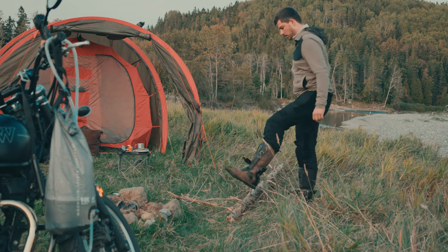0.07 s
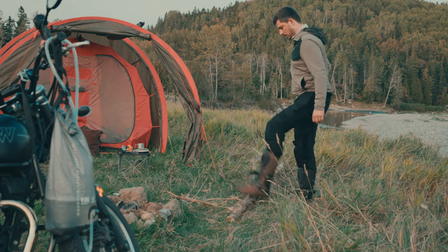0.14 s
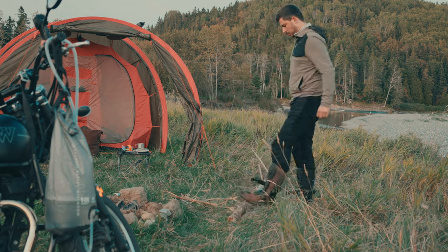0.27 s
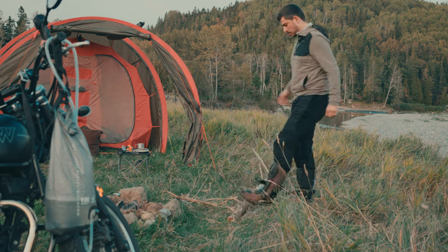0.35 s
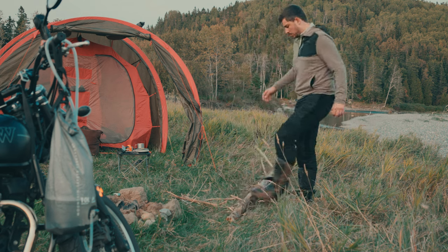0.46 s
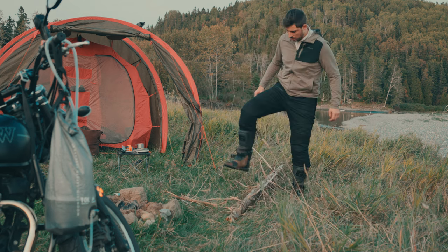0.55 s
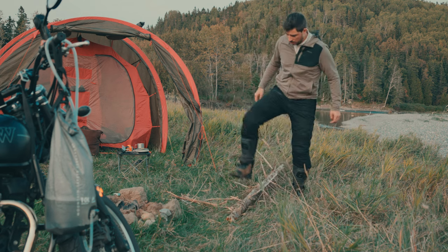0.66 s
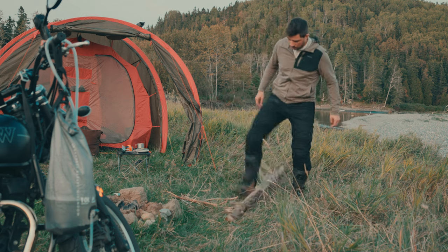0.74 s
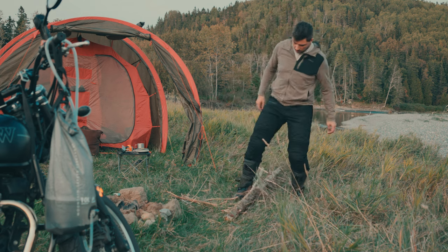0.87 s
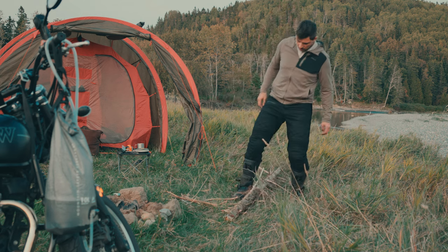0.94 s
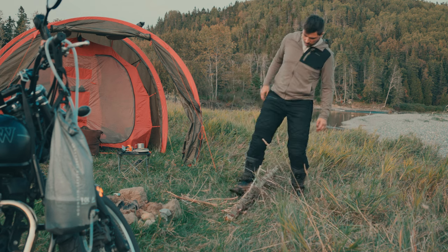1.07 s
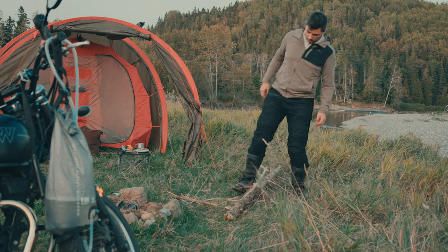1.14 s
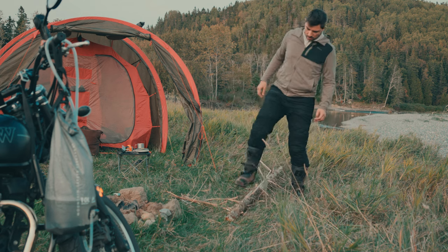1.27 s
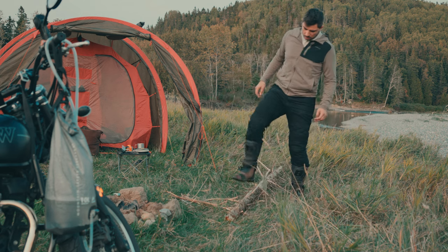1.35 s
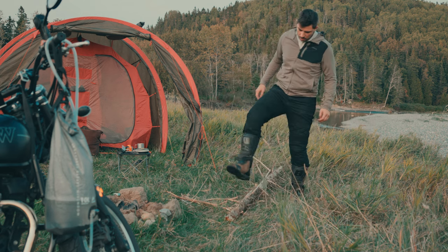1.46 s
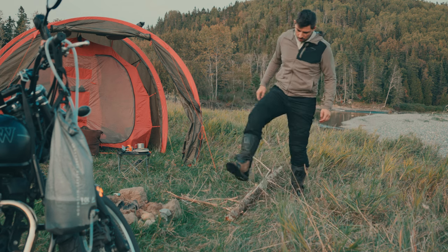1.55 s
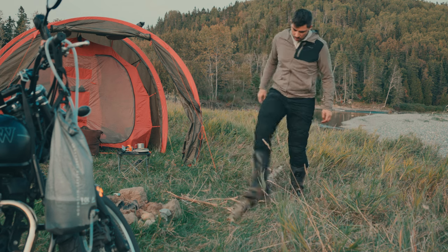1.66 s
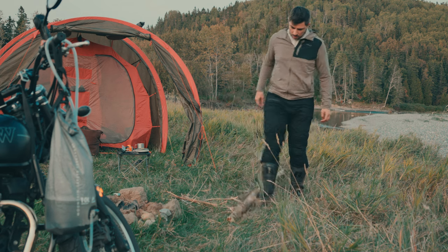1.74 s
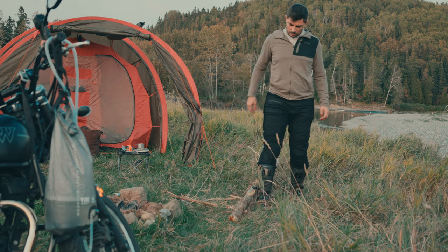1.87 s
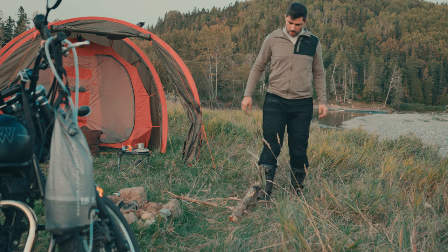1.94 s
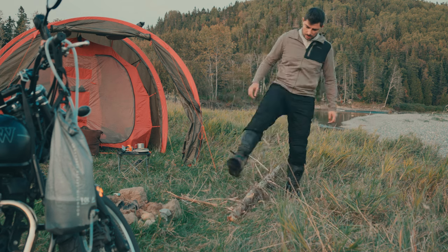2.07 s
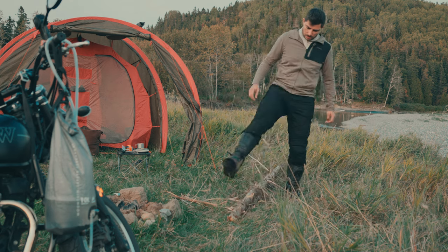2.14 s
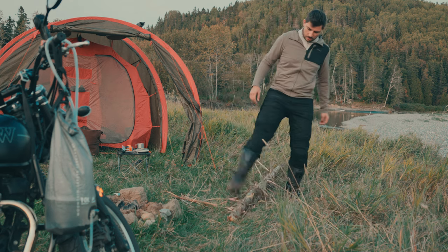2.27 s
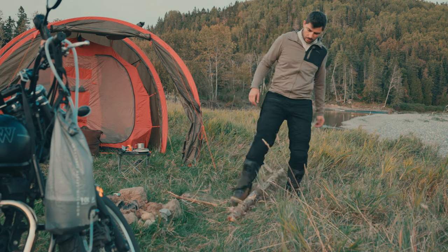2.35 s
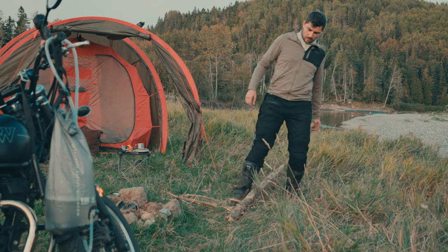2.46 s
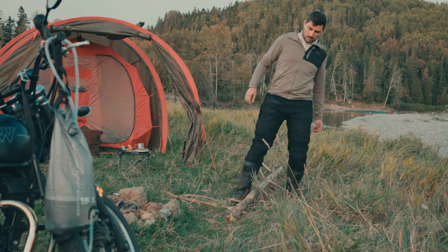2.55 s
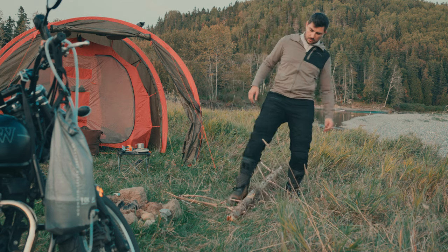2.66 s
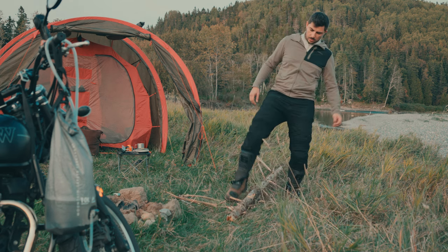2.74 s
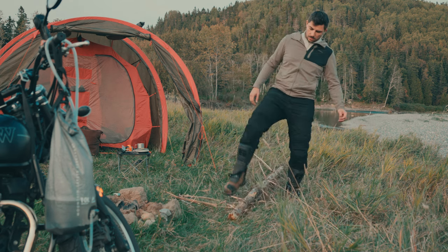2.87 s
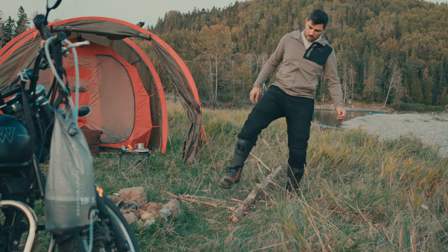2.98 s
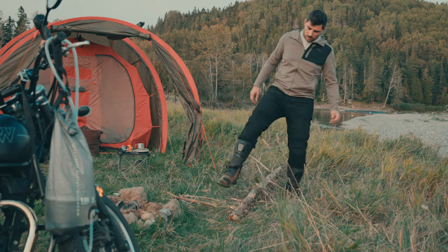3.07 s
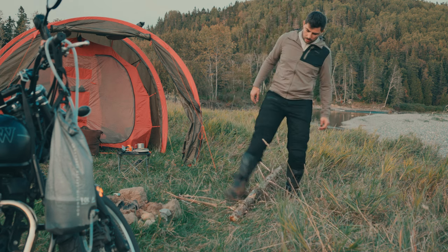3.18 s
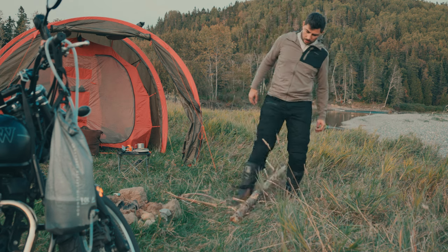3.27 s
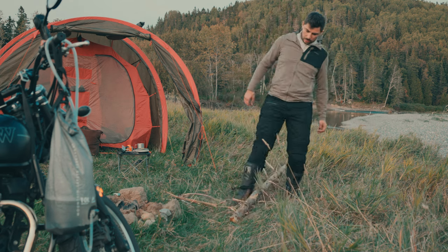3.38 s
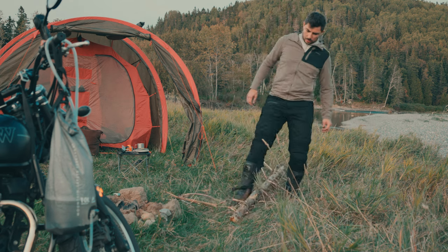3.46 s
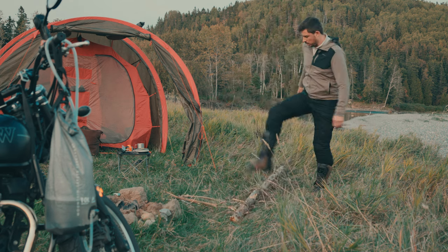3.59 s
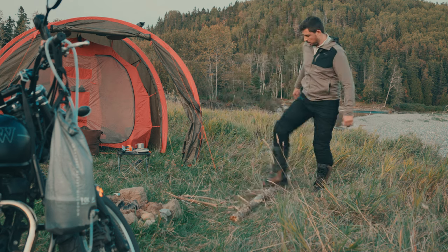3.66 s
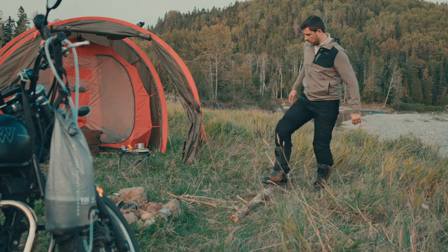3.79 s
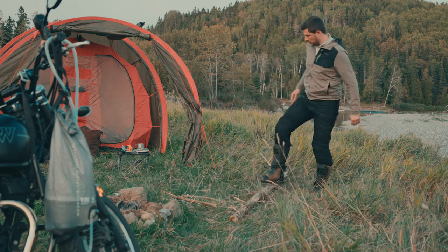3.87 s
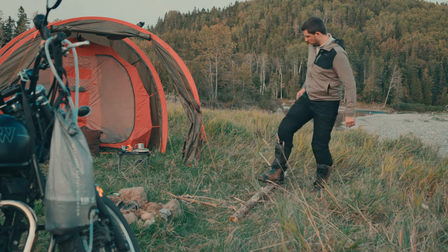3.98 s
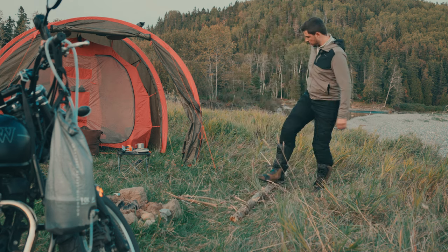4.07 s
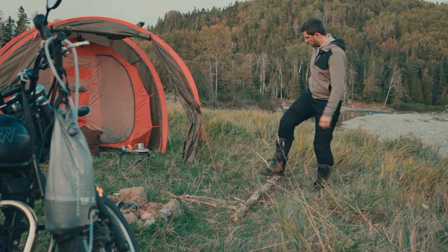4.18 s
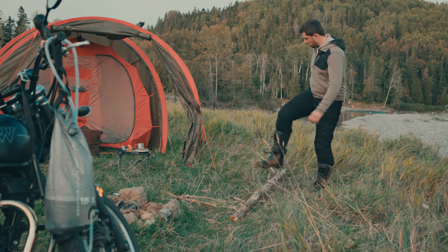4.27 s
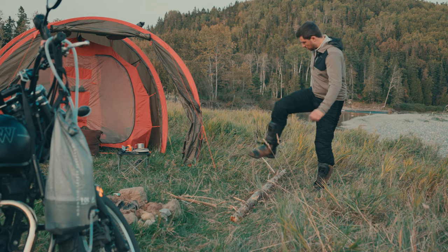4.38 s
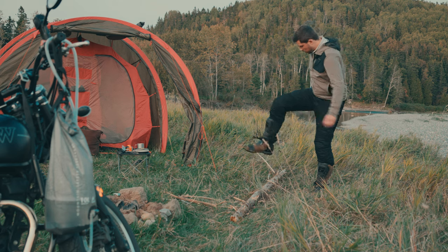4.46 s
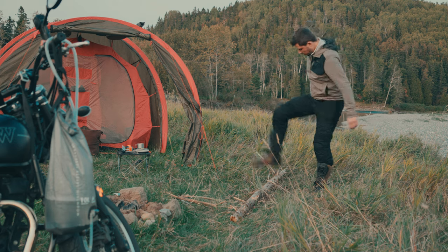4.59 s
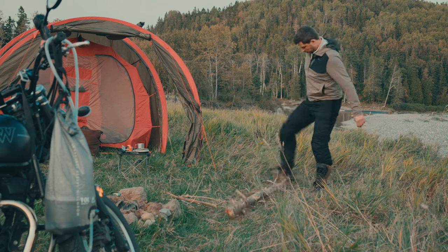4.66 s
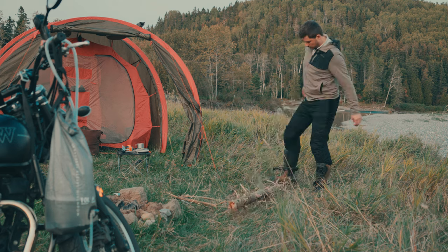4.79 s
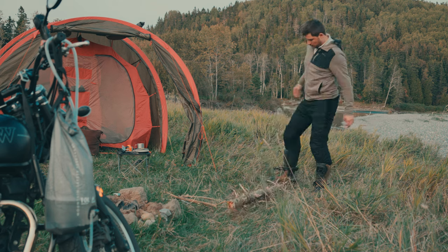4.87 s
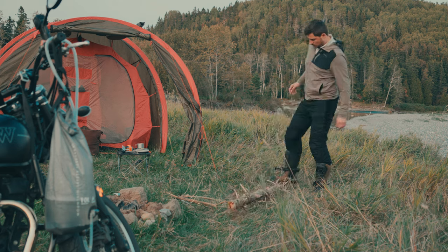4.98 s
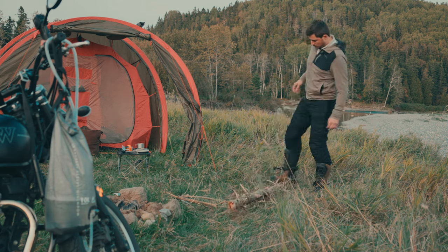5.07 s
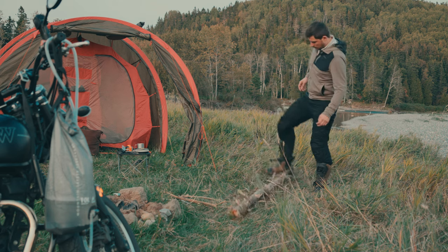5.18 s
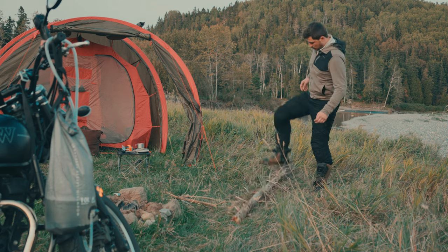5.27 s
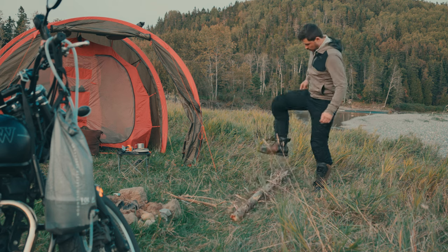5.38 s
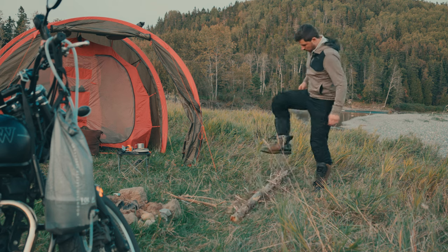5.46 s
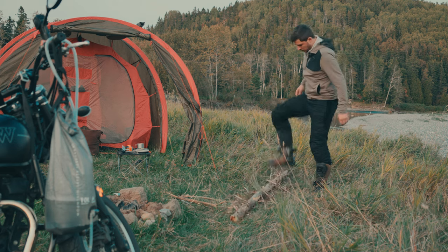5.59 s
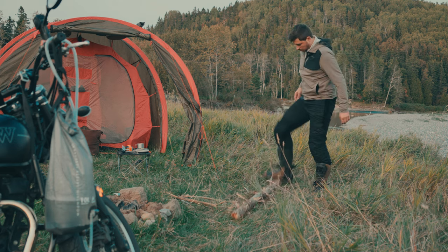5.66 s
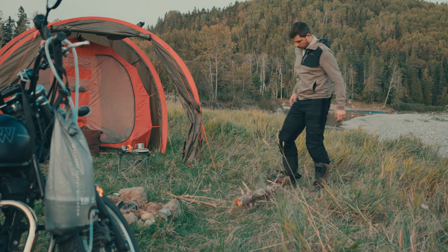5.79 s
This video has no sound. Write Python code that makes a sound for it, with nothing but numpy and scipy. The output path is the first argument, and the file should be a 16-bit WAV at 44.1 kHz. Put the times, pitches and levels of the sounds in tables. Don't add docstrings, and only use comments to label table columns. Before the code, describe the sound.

A boot stamps dry branches apart on grass in bursts of sharp cracks and crunches, with low wind buffeting and faint river hiss.

```python
import sys
import numpy as np
from scipy import signal
from scipy.fft import rfft, irfft, next_fast_len
from scipy.io import wavfile
from scipy.ndimage import uniform_filter1d

SR = 44100
rng = np.random.default_rng(int(sys.argv[2]) if len(sys.argv) > 2 else 0)


def invert_db(x):
    u = np.asarray(x, float) / 20
    return 10 ** u


def file_out(sig):
    cols = np.atleast_2d(sig).T
    lim = np.clip(cols, -1, 1)
    pcm = np.round(lim * 32767).astype(np.int16)
    wavfile.write(sys.argv[1], SR, pcm)


N = 257102

# time in seconds, wind level in dB, how far the gust reaches up in pitch in dB.
GUSTS = [(0.0, -36.5, 4), (0.42, -32.5, 5), (0.75, -40, 1), (0.86, -38, 1), (1.1, -41, 0), (1.28, -36.5, 2),
         (1.51, -37, 3), (2.06, -34, 5), (2.42, -37.5, 4), (2.79, -35.5, 3), (3.04, -38.5, 3),
         (3.49, -35, 3), (3.62, -41, -1), (4.3, -42, -9), (4.62, -42, -9), (4.9, -40, 0), (5.5, -41.5, -5),
         (5.83, -49, -4)]


def level(x):
    return x / np.sqrt(np.mean(x ** 2))


def band(x, lo_hz, hi_hz, order=2):
    return signal.sosfilt(signal.butter(order, [lo_hz, hi_hz], "band", fs=SR, output="sos"), x)


def treble(x):
    return band(band(x, 5200, 18000), 3000, 6500, order=1)


def coloured(points):
    hz, db = np.transpose(points)
    size = next_fast_len(N)
    log_hz = np.log(np.arange(size // 2 + 1) * SR / size + 1)
    gain = invert_db(np.interp(log_hz, np.log(hz), db))
    white = rfft(rng.standard_normal(N), size)
    return level(irfft(white * gain, size)[:N])


def curve(rows, rest_db):
    s, *columns = np.transpose(rows)
    t = np.arange(N) / SR
    return np.array([np.interp(t, s, c, rest_db, rest_db) for c in columns])


def walk(rate):
    k = int(SR / rate)
    steps = np.repeat(rng.standard_normal(N // k + 1), k)
    return uniform_filter1d(uniform_filter1d(steps, k), k)[:N]


def grains(rate, scatter_db):
    when, size = rng.random(N), rng.exponential(size=N)
    sign = np.sign(rng.standard_normal(N))
    return (when < rate / SR) * sign * invert_db(scatter_db * np.minimum(size, 4))


def ring(t, hz, t60):
    return np.sin(2 * np.pi * hz * t) * np.exp(-np.log(1000) * t / t60)


def add(out, s, sound):
    i = int(s * SR)
    out[i:i + len(sound)] += sound[:N - i]


def all_cracks():
    # time in seconds, level in dB, ring in Hz,
    # treble snap in dB, thick-wood knock in dB.
    snaps = [(.212, -2.5, 3906, -16, -14.5), (0.2174, -9.5, 3675, -17, -12.5),
             (1.7322, -11, 3600, -28, -31), (1.7368, -20.5, 3000, -2, -19), (1.7438, -18, 2970, -24, -32),
             (2.3616, -20, 1970, -29, -22), (2.3978, -25, 3800, -2, -12), (2.4207, -28.5, 2820, 1.5, -16),
             (3.2849, -14, 2420, -17, -2.5), (3.6811, -13.5, 3840, -2, -11), (4.7046, -15.5, 2815, -21, 0),
             (4.7084, -3, 4700, -18, -16.5), (4.7292, -14, 3670, -13.5, -14),
             (4.7625, -25.5, 2890, 3.5, -20), (5.705, -15, 4700, 0.5, -18.5), (5.7652, -23.5, 2900, -7, -7)]
    # time in seconds, level in dB, ring in Hz,
    # treble snap in dB, thick-wood knock in dB.
    rips = [(0.1875, -29, 2210, -5, 4), (.205, -26.5, 2140, -15.5, -15), (0.23, -26.5, 2000, -13, -16),
            (0.7834, -23, 2620, -17, -15), (.7978, -5, 4320, -6, -7), (0.812, -21, 3800, -6, -20.5),
            (1.6711, -25, 4430, -8, -22.5), (1.7773, -16.5, 3100, -7.5, -6), (2.3914, -24.5, 2470, -8, 4),
            (3.6755, -8, 3000, -22, -24.5), (3.687, -19.5, 2586, -13, -28.5),
            (4.7202, -21.5, 2870, -5.5, -2), (4.7493, -12.5, 2700, -2, -16)]
    # time in seconds, level in dB, ring in Hz,
    # thick-wood knock in dB.
    splits = [(0.1809, -28.5, 2910, 8), (0.1907, -29.5, 1570, 1), (.2356, -20.5, 2110, -10),
              (.748, -27.5, 3940, -20), (.7554, -37, 3190, 3), (0.7622, -28, 3300, -3),
              (0.8184, -19, 3470, -28), (1.657, -37, 1500, -16), (1.68, -33, 3560, -17),
              (1.6942, -25.5, 3510, -9), (1.7243, -31, 3740, -16), (1.7606, -23, 3350, -28),
              (1.7952, -23.5, 3300, 4), (1.812, -35, 2270, -5), (2.3368, -28.5, 2370, 9.5),
              (2.3565, -26.5, 3770, -12), (2.3775, -31, 2300, -20), (3.2366, -31, 1510, 13.5),
              (3.2463, -38, 3150, 14), (3.255, -29, 3900, -16), (3.264, -23, 3900, -15),
              (3.3008, -35, 2240, -12), (3.6894, -21, 4470, -19), (3.7111, -27, 3850, -6),
              (4.6616, -23.5, 4310, -4.5), (4.7125, -26, 2620, 10), (5.7018, -29.5, 2635, -20)]
    # time in seconds, level in dB,
    # ring in Hz, treble snap in dB.
    ticks = [(0.282, -31, 4070, -5), (.2897, -38, 3730, -10.5), (0.3123, -40.5, 4070, -4),
             (0.3492, -42.5, 4110, -8), (0.3893, -33, 4400, -3), (0.859, -39, 3880, -6),
             (1.1395, -41, 3900, -9), (2.4783, -43, 1810, -22.5), (2.8767, -49, 2970, -19),
             (3.3068, -31, 2110, -20.5), (3.3567, -36, 2130, -21), (3.6693, -29, 3800, -5),
             (3.7167, -31, 4030, -17), (3.787, -42.5, 3960, -26), (3.841, -46, 2480, -7),
             (4.2057, -43, 2500, -13), (4.268, -47, 4590, -16), (4.6423, -37.5, 3010, -12.5),
             (4.6749, -30, 4240, -10), (4.6846, -36, 4000, -4), (4.86, -42, 1990, -13),
             (5.132, -27.5, 4100, -11), (5.1496, -37, 4000, -16), (5.1623, -32, 4300, -13),
             (5.4611, -44, 2970, -14), (5.7138, -36, 2850, 2), (5.718, -28, 2600, 1),
             (5.7242, -30, 2800, -14), (5.7567, -33, 3840, 1), (5.8, -46, 1790, 2)]
    split_snap_db, tick_knock_db = -18.5, -17
    rows = [(*r, 0.38) for r in snaps]
    rows += [(*r, 3.2) for r in rips]
    rows += [(s, db, hz, split_snap_db, knock_db, 1.8) for s, db, hz, knock_db in splits]
    rows += [(*r, tick_knock_db, 0.98) for r in ticks]
    return [(*r, tear_ms * 3000 / r[2]) for *r, tear_ms in rows]


def cracks(partner_db=-6, broad_db=-3, fibre_db=3, creak_s=0.0026, creak_db=-20, tail_s=0.0058, tail_db=-22):
    out, t = np.zeros(N), np.arange(2048) / SR
    peak = 400
    late = t - t[peak]
    twig_t60_s = 0.0038
    for s, db, hz, snap_db, knock_db, tear_ms in all_cracks():
        size, noise = rng.exponential(size=len(t)), rng.standard_normal(len(t))
        tear_s = 0.00062 * tear_ms
        rise_s = min(0.5 * tear_s, 0.0007)
        before = np.exp(late / rise_s) + invert_db(creak_db) * np.exp(late / creak_s)
        after = np.exp(-(late / tear_s) ** 2 / 2) + invert_db(tail_db) * np.exp(-late / tail_s)
        fibres = noise * invert_db(fibre_db * (np.minimum(size, 3) - 4.0))
        fibres[peak] = 1.1
        fibres = fibres * np.where(late < 0, before, after)

        partner_hz = min((1.07 + 0.31 * rng.random()) * hz, 5600)
        twig = ring(t[:peak], hz, twig_t60_s) + invert_db(partner_db) * ring(t[:peak], partner_hz, twig_t60_s)
        twig = band(twig, 0.67 * hz, 8000)
        ringing = np.convolve(fibres, twig)[:len(t)]
        broad = band(fibres, 0.8 * hz, 1.69 * hz)
        knock = band(fibres, 690, 1300)
        parts = [ringing, broad, treble(fibres), knock]
        loud = [np.sqrt(uniform_filter1d(p ** 2, size=56).max()) for p in parts]
        gains = invert_db(db + np.array([-1.2, broad_db, snap_db + 0.52, knock_db - 0.5]))
        add(out, s - t[peak] - 0.0004, sum(g * p / l for g, p, l in zip(gains, parts, loud)))
    return out


def splinter_rows():
    # time in seconds, level in dB, ring in Hz.
    slivers = [(.1863, -31, 6370), (0.2111, -12, 1926), (0.2129, -8, 1890), (.2138, -19, 3710),
               (.2288, -15, 4650), (.2464, -36, 2760), (.748, -29, 8270), (.7603, -35, 5340),
               (.7907, -29, 3790), (0.799, -7.5, 3500), (0.7996, -12.5, 2300), (.8122, -26, 8500),
               (0.8126, -14, 4100), (.813, -19, 1890), (.8249, -30, 1720), (1.6602, -31, 690),
               (1.6714, -16, 2210), (1.671, -21, 5600), (1.681, -29, 5000), (1.6935, -25, 1550),
               (1.7246, -36, 1890), (1.7368, -30, 6720), (1.7602, -33, 6550), (1.7806, -14, 2330),
               (1.7986, -20, 2410), (1.7979, -28, 4160), (2.3564, -22, 2410), (2.3617, -22, 3900),
               (2.3655, -24, 2180), (2.3744, -26, 3960), (2.3912, -15, 3900), (2.3976, -32, 8100),
               (2.3995, -21, 2760), (2.408, -26, 2410), (3.242, -27, 2580), (3.2445, -40, 6500),
               (3.2539, -29, 3270), (3.2663, -27, 2410), (3.2726, -34, 3620), (3.2828, -15.5, 1110),
               (3.2846, -10.5, 4000), (3.288, -22, 3520), (3.315, -31, 2580), (3.6967, -19, 1550),
               (3.7103, -22, 3790), (4.6749, -30, 5860), (4.6973, -32, 4130), (4.708, -16, 6550),
               (4.7082, -4.5, 2460), (4.7203, -29, 7060), (4.7258, -9, 2920), (4.7427, -24, 4820),
               (4.748, -7, 3620), (5.706, -16, 4500), (5.7058, -12, 2900), (5.7064, -17, 8270),
               (5.7136, -18, 2760), (5.714, -34, 8050), (5.7654, -24, 5640), (5.7998, -37, 860)]
    # time in seconds, level in dB, ring in Hz, tear in ms.
    squeaks = [(.213, -23, 1020, 4.8), (.242, -25, 2240, 3), (2.792, -43, 800, 3.2), (2.869, -40, 850, 3),
               (2.879, -38.5, 2970, 5.4), (2.881, -39, 1050, 3), (2.882, -45, 4150, 2.8),
               (3.302, -26, 2300, 1.5), (3.694, -23.5, 4400, 4), (3.692, -29, 5900, 4),
               (4.7347, -20, 1203, 4.5), (5.151, -40, 5000, 1.1), (5.7204, -27, 2410, 3),
               (5.7198, -29, 5510, 3), (5.7205, -33, 7900, 4), (5.7255, -28, 3090, 3),
               (5.7347, -37, 2410, 3), (5.7785, -35, 3100, 3), (5.787, -40, 3600, 3)]
    # time in seconds, level in dB, ring in Hz.
    stalks = [(.919, -39, 2700), (1.041, -37, 3100), (1.051, -48, 5200), (1.076, -38, 3600),
              (1.0905, -36, 1100), (1.127, -39, 3580), (1.149, -36.5, 3900), (2.05, -54, 8950),
              (2.82, -58, 5000), (2.957, -46, 3000), (3.338, -35, 2500), (3.18, -55, 8000)]
    # time in seconds, level in dB, ring
    # in Hz.
    more_slivers = [(.3895, -37, 2800), (.7975, -10.5, 2490), (0.7983, -19, 6000), (1.6708, -19, 4170),
                    (1.7372, -19.5, 3000), (1.7445, -24, 3940), (2.3618, -20, 1493), (2.3905, -19, 1000),
                    (3.6762, -3.5, 3370), (3.6775, -12.5, 4400), (3.678, -20, 5800), (3.686, -15.5, 2490),
                    (3.7168, -29, 3900), (5.132, -28, 5000), (5.1628, -36, 5260), (5.7005, -22.5, 2000),
                    (5.7628, -27, 2820), (5.7657, -20, 2770), (5.7013, -22.5, 3180), (.2365, -23.5, 2200),
                    (.1815, -28, 2800), (.8185, -23.5, 2400), (.784, -25, 4000)]
    # time in seconds, level in dB, ring in Hz, ring in cycles.
    shards = [(5.7051, 1, 2600, 13), (5.7032, -12, 2500, 8), (5.7077, -15, 2300, 10), (1.744, -5, 3600, 5),
              (2.3616, -9, 2200, 4), (2.364, -15, 2200, 7), (1.7368, -12, 3300, 6), (4.7283, -2, 3700, 8),
              (4.7245, -15, 3400, 8), (4.7642, -24, 2900, 16), (5.1495, -28, 4300, 10),
              (5.1503, -28, 5200, 10), (5.1295, -37, 3700, 14), (4.6415, -37, 3600, 6),
              (1.7948, -17, 3300, 6), (1.7978, -20, 1500, 6), (1.7655, -20, 3500, 5),
              (2.3563, -16, 3200, 5), (2.3905, -14, 2600, 5), (.182, -20, 2900, 6), (.2045, -22, 3000, 8),
              (.2062, -24, 5000, 10), (4.7515, -9, 2600, 12), (5.7655, -18, 2900, 7)]
    # time in seconds, level in dB, ring in Hz.
    short_rings = [(0.212, -8.0, 3600.0), (0.2137, -19.0, 6870.0), (0.2142, -17.0, 2390.0),
                   (0.7982, -14.0, 2100.0), (0.7995, -14.0, 4610.0), (0.8126, -18.0, 4720.0),
                   (0.8129, -20.0, 6160.0), (1.7313, -19.0, 2800.0), (1.7372, -16.0, 3370.0),
                   (2.364, -18.0, 2090.0), (3.6749, -13.0, 3610.0), (3.6762, -19.0, 7710.0),
                   (3.6767, -17.0, 5870.0), (3.6773, -13.0, 4610.0), (3.69, -22.0, 8470.0),
                   (3.6957, -18.0, 4300.0), (4.7081, -15.0, 2100.0), (4.7088, -14.0, 3460.0),
                   (4.7105, -19.0, 1510.0), (4.7105, -13.0, 3960.0), (4.7111, -17.0, 1160.0),
                   (4.7117, -19.0, 3290.0), (4.7161, -18.0, 2380.0), (4.7212, -19.0, 2990.0),
                   (4.7226, -19.0, 5060.0), (4.7263, -18.0, 1000.0), (4.7283, -17.0, 9600.0),
                   (4.7283, -17.0, 12330.0), (4.7284, -13.0, 2800.0), (4.7284, -12.0, 4610.0),
                   (4.7286, -8.0, 3660.0), (4.729, -17.0, 1600.0), (4.7472, -18.0, 4710.0),
                   (4.7477, -16.0, 2570.0), (5.7032, -15.0, 2800.0), (5.7051, -12.0, 3610.0)]
    main = invert_db(23.5)
    rows = [(*r, 0.6, 26, main) for r in slivers]
    rows += [(*r, 20, 0) for r in squeaks]
    rows += [(*r, 1.34, 4, 0) for r in stalks]
    rows += [(*r, 0.6, 26, main) for r in more_slivers]
    rows += [(s, db, hz, 0.5, cycles, main) for s, db, hz, cycles in shards]
    rows += [(*r, 0.5, 15, main) for r in short_rings]
    return rows


def splinters():
    out, t = np.zeros(N), np.arange(2048) / SR
    middle = 660
    for s, db, hz, tear_ms, cycles, main in splinter_rows():
        noise = rng.standard_normal(len(t))
        fibres = noise * np.exp(-((t - t[middle]) * 1000 / tear_ms) ** 2 / 2)
        fibres[middle] += main * np.sign(noise[middle])
        sound = np.convolve(fibres, ring(t, hz, cycles / hz))[:len(t)]
        sound = band(sound, 0.6 * hz, min(2.0 * hz, SR / 2 - 1), order=1)
        size = np.abs(sound)
        add(out, s - t[size.argmax()], invert_db(db) * sound / size.max())
    return out


def crunch(rise_s=0.001, fall_s=0.011, sag_db=-7):
    # start in seconds, splinter level in dB,
    # low crunch in dB above the splinters, hold in ms.
    presses = [(.179, -37, -20, 52), (0.209, -32.5, 5.5, 20), (.222, -28.5, -11, 24),
               (.243, -45.5, -2.5, 70), (0.746, -34.5, -4.5, 31), (0.785, -30.5, 4, 17),
               (0.798, -26.5, -3.5, 19), (.825, -48.5, -2, 61), (1.644, -65, 24, 27), (1.669, -36.5, 0, 69),
               (1.727, -29, -9.5, 72), (1.799, -54, 5.5, 91), (2.334, -40, 3.5, 109), (2.386, -37, 3.5, 37),
               (2.43, -52, -8, 33), (2.46, -53, -4, 69), (2.791, -63.5, 4, 150), (3.239, -37.5, 3.5, 59),
               (3.28, -35, 5, 36.4), (3.325, -50, 3.5, 63), (3.659, -40, 2.5, 41), (3.673, -17.5, -10, 25),
               (3.7, -35.5, -4, 27), (3.725, -49, -6.5, 59), (4.656, -38, -3.5, 82), (4.702, -25, -1, 37),
               (4.738, -24.5, -6.5, 18.3), (4.756, -43, -15, 37), (5.699, -40, 0.5, 38),
               (5.728, -44, -3.5, 79)]
    fine_db, heavy_dulls = -14, 0.3
    settle_s, settle_db = 0.024, -14
    t, power = np.arange(SR // 5) / SR, np.zeros((3, N))
    for s, db, low_db, hold_ms in presses:
        shape = invert_db(2.5 + sag_db * t * 1000 / hold_ms) * (1 - np.exp(-t / rise_s))
        lifted = np.maximum(t - hold_ms / 1000, 0)
        shape = shape * (np.exp(-lifted / fall_s) + invert_db(settle_db) * np.exp(-lifted / settle_s))
        gains = invert_db(db + np.array([0, fine_db - heavy_dulls * low_db, low_db]))
        for row, gain in zip(power, gains):
            add(row, s, (gain * shape) ** 2)
    dense = grains(6000, 3.2)
    spurts = invert_db(2.4 * walk(170))
    lumps = grains(2500, 3.0)
    sizes = [spurts * band(dense, 1700, 5080), spurts * treble(dense), band(lumps, 100, 1100)]
    return sum(np.sqrt(p) * level(g) for p, g in zip(power, sizes))


def soft_push(t):
    return 1 - np.exp(-t / 0.0014)


def boot_thuds(upper_db=-9, turf_db=-8):
    # time in seconds, peak in dB, pitch in Hz, 60 dB decay in seconds.
    thuds = [(0.182, -23, 277, 0.04), (0.209, -24.5, 426, 0.06), (0.539, -38, 148, 0.029),
             (0.758, -28, 148, 0.063), (0.796, -8.5, 295, 0.023), (0.847, -25, 108, 0.028),
             (1.089, -26, 250, 0.027), (1.699, -24, 123, 0.044), (1.775, -21, 256, 0.052),
             (2.056, -32.5, 110, 0.077), (2.335, -10, 357, 0.024), (2.3565, -11, 187, 0.027),
             (2.389, -17.5, 247, 0.066), (2.475, -21, 250, 0.04), (2.515, -30, 203, 0.035),
             (3.208, -26, 110, 0.022), (3.236, -17, 400, 0.024), (3.283, -35, 279, 0.027),
             (3.333, -30, 422, 0.039), (3.358, -24.5, 254, 0.057), (3.574, -35, 135, 0.039),
             (3.684, -24, 435, 0.1), (4.702, -17, 569, 0.079), (4.726, -16, 424, 0.03),
             (5.699, -28, 196, 0.037), (5.761, -33, 700, 0.04)]
    out, t = np.zeros(N), np.arange(SR // 3) / SR
    for s, db, hz, t60 in thuds:
        upper_hz = hz * (1.3 + 0.4 * rng.random())
        turf = level(band(rng.standard_normal(len(t)), 0.11 * hz, 2.1 * hz))
        turf = turf * np.exp(-np.log(1000) * t / t60)
        body = ring(t, hz, t60) + invert_db(upper_db) * ring(t, upper_hz, t60) + invert_db(turf_db) * turf
        add(out, s, invert_db(db + 1.0) * soft_push(t) * body)
    return out


def log_rings():
    # time in seconds, peak in dB, pitch in Hz, 60 dB decay in seconds.
    rings = [(1.09, -33.5, 396, .04), (1.701, -16.5, 128.6, 0.099), (2.354, -41, 186, .1),
             (2.393, -20, 280, 0.2), (2.398, -20.5, 136.4, 0.084), (2.88, -41, 284, 0.24),
             (3.242, -16, 183, 0.052), (3.285, -20, 275.3, 0.2), (3.291, -24.5, 138, 0.13),
             (3.685, -15, 418, 0.082), (3.693, -30, 161, 0.12), (3.774, -39, 200, 0.035),
             (4.858, -44, 223, .05)]
    out, t = np.zeros(N), np.arange(SR // 3) / SR
    for s, db, hz, t60 in rings:
        add(out, s, invert_db(db) * soft_push(t) * ring(t, hz, t60))
    return out


def grass():
    # start in seconds, rustle level in dB,
    # length in seconds, fade in dB per second (steep when the boot lands).
    swishes = [(0.244, -61, 0.28, 2500), (0.734, -60, .02, 296), (0.846, -65, 0.066, 300),
               (.93, -71, .1, 60.5), (1.03, -65, 0.14, 61), (1.82, -65, 0.23, 2500), (2.07, -79.5, .1, 41),
               (2.446, -67.5, 0.13, 100), (2.82, -70.5, 0.11, 57), (3.17, -69, .06, 302),
               (3.332, -64.5, 0.18, 119), (3.76, -63, 0.16, 93), (3.96, -79, 0.14, 62),
               (4.12, -71, 0.12, 196), (4.63, -69, .03, 299), (4.786, -58.5, .03, 198),
               (4.9, -69, 0.41, 105), (5.217, -63.5, 0.18, 90), (5.69, -60, 0.13, 100)]
    rise_db_s, sag_db_s, breeze_db = 345.5, 13.5, -80
    rustle = level(band(grains(6000, 3.4), 4000, 8300, order=1))
    t = np.arange(N)[::32] / SR
    power = np.zeros(len(t))
    for s, db, length, fade in swishes:
        swell_db = db - rise_db_s * np.maximum(s - t, 0)
        sag_db = sag_db_s * np.maximum(t - s, 0)
        fade_db = fade * np.maximum(t - s - length, 0)
        power += invert_db(swell_db - sag_db - fade_db) ** 2
    power = np.interp(np.arange(N) / SR, t, power)
    return rustle * np.sqrt(power + invert_db(breeze_db) ** 2) * invert_db(2.2 * walk(41))


def wind(split_hz=52):
    # frequency in Hz, density in dB per Hz.
    buffeting = [(12, -36.5), (20, -4), (36, -2.5), (50, -3.5), (68, -10), (90, -21.5), (150, -33.5),
                 (250, -44), (400, -87.5)]
    mesh_evens = 0.2
    air = coloured(buffeting)
    gust_db, reach_db = curve(GUSTS, -42)
    gust_db = gust_db + 0.85 * walk(5.8)
    envelope = np.abs(signal.hilbert(air, next_fast_len(N))[:N])
    air = level(air / (envelope + 0.15) ** mesh_evens)
    air = signal.sosfiltfilt(signal.butter(4, 240, fs=SR, output="sos"), air)
    deep = signal.sosfiltfilt(signal.butter(2, split_hz, fs=SR, output="sos"), air)
    return invert_db(gust_db) * (deep + invert_db(reach_db) * (air - deep))


def rush():
    reach_db = curve(GUSTS, 0)[1]
    hiss = level(band(rng.standard_normal(N), 140, 520))
    return invert_db(-70 + 0.5 * reach_db + 1.5 * walk(9)) * hiss


def river():
    # frequency in Hz, density in dB.
    rapids = [(80, -18), (200, -13), (400, -6), (750, 0), (1400, -2), (2300, -1), (3000, -4.5),
              (4200, -12.5), (5500, -16.5), (7000, -42), (10000, -40), (16000, -52)]
    water = coloured(rapids)
    low = signal.sosfilt(signal.butter(2, 1300, fs=SR, output="sos"), water)
    hiss = low * invert_db(0.39 * walk(27)) + (water - low) * invert_db(1.2 * walk(9.9))
    swell = invert_db(0.3 * walk(0.7))
    bubbles = level(band(grains(370, 2.5), 660, 4800, order=4))
    return invert_db(-50.5) * swell * (hiss + invert_db(-15.5) * bubbles)


def scene():
    wood = cracks() + splinters()
    boot = crunch() + boot_thuds() + log_rings() + grass()
    background = wind() + rush() + river()
    return (wood + boot + background)[None]


def band_limit(x):
    return signal.sosfilt(signal.butter(12, 16440, fs=SR, output="sos"), x)


def record(dry):
    heard = signal.sosfilt(signal.ellip(8, 0.5, 45, 15650, fs=SR, output="sos"), dry)
    return band_limit(np.clip(heard, -1, 1))


dry = scene()
out = record(dry)
file_out(out)
```